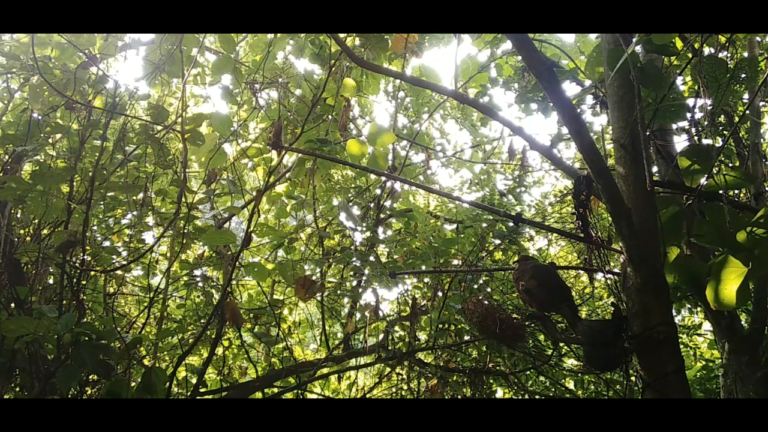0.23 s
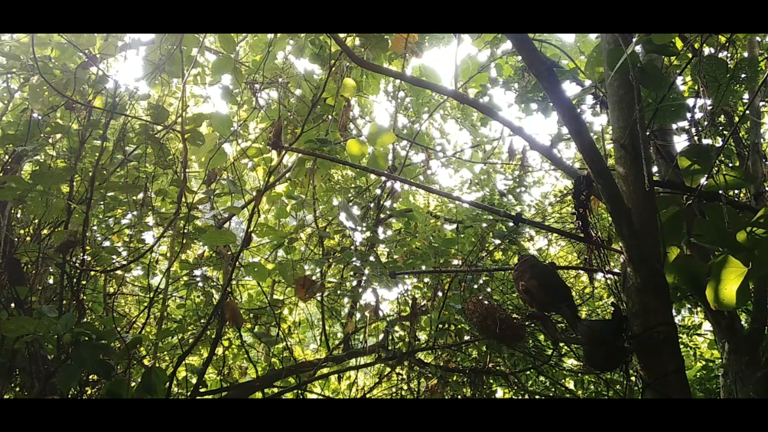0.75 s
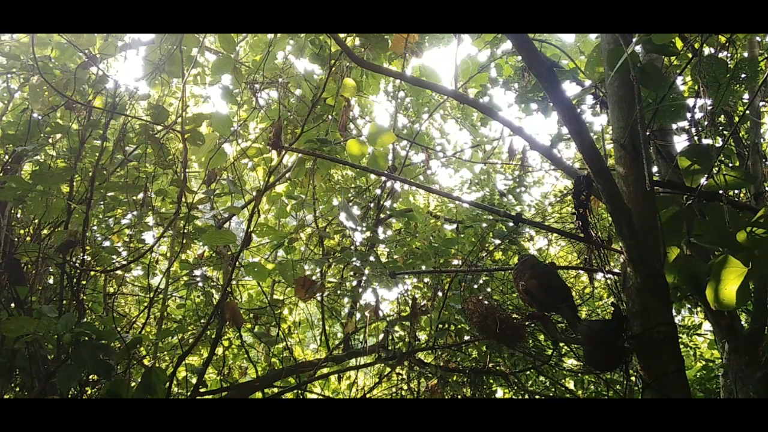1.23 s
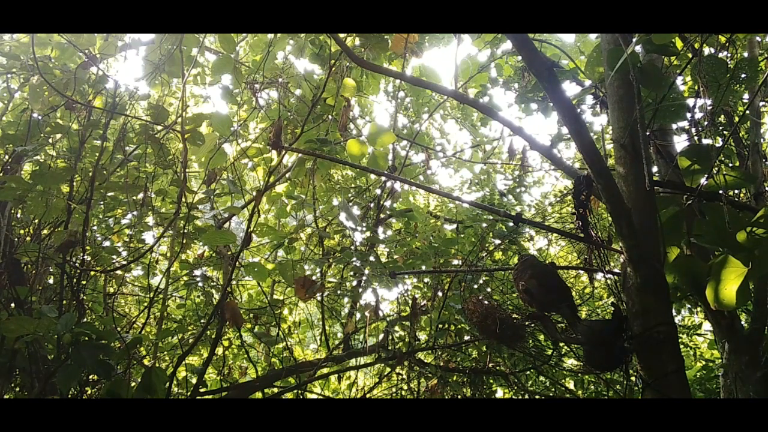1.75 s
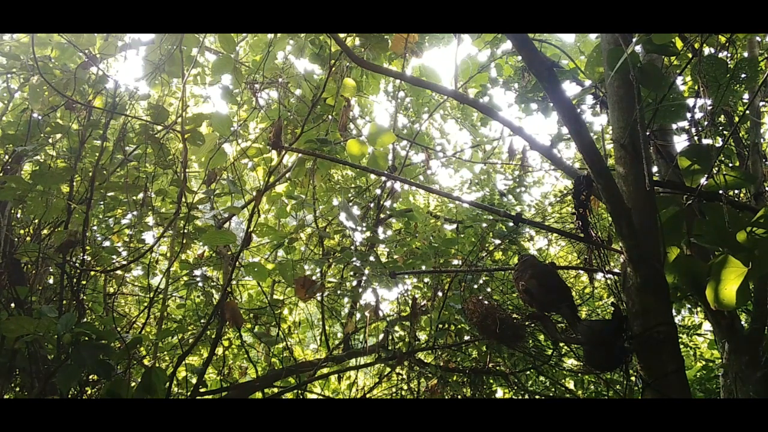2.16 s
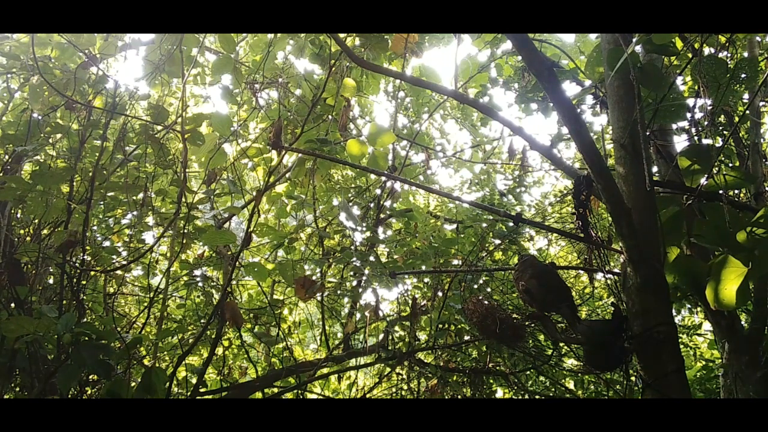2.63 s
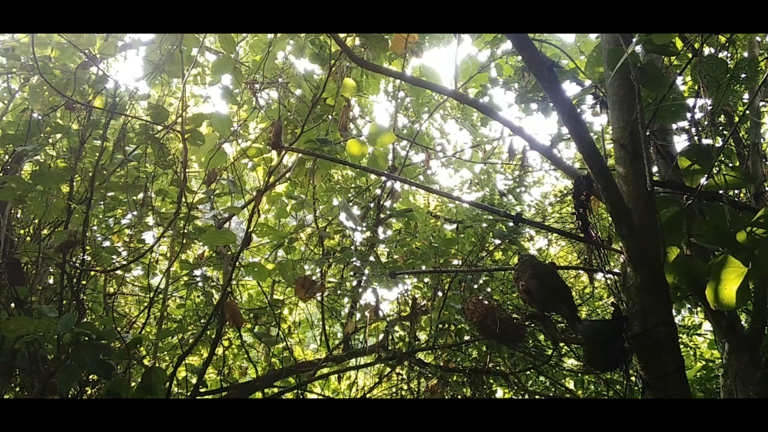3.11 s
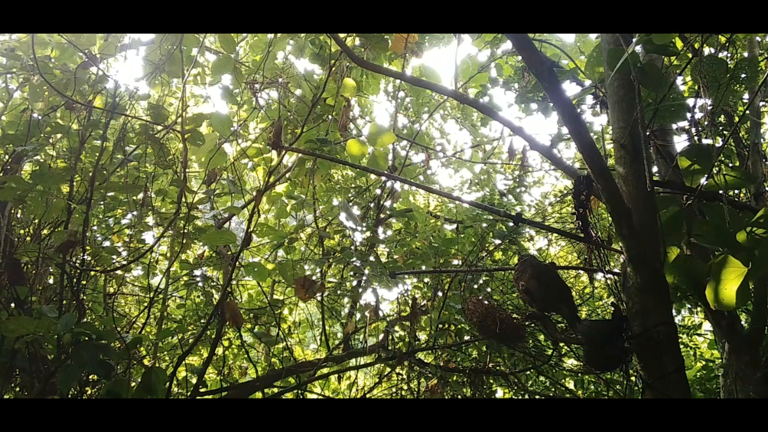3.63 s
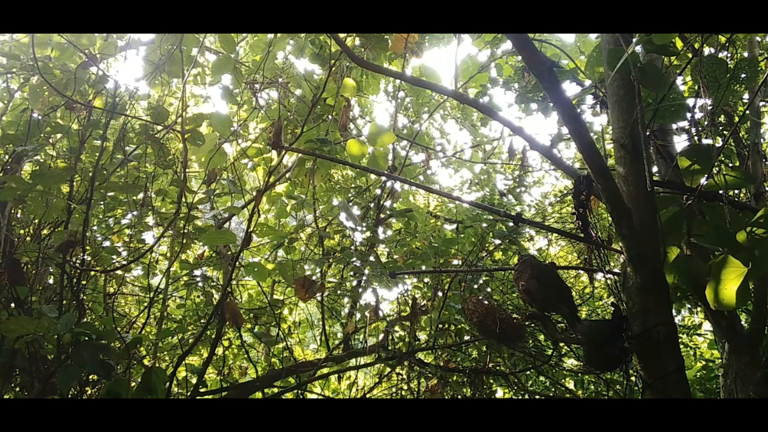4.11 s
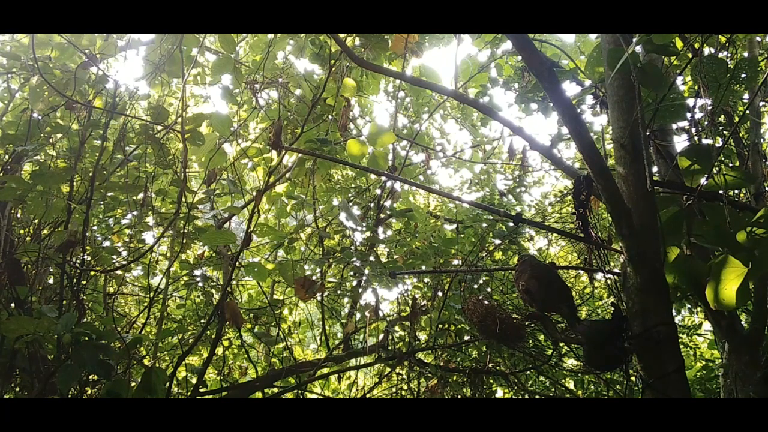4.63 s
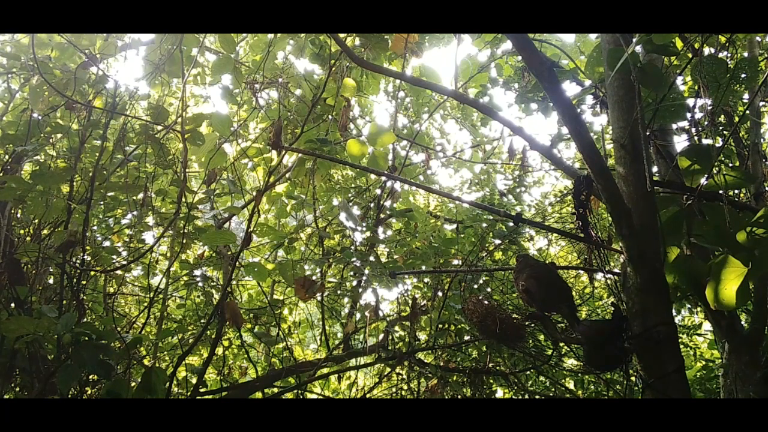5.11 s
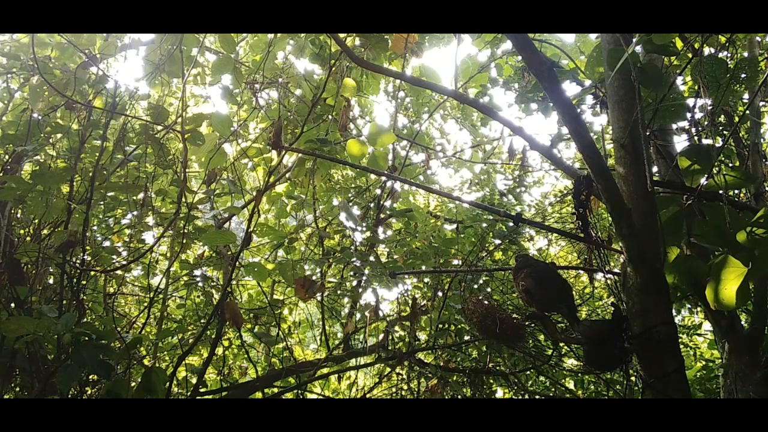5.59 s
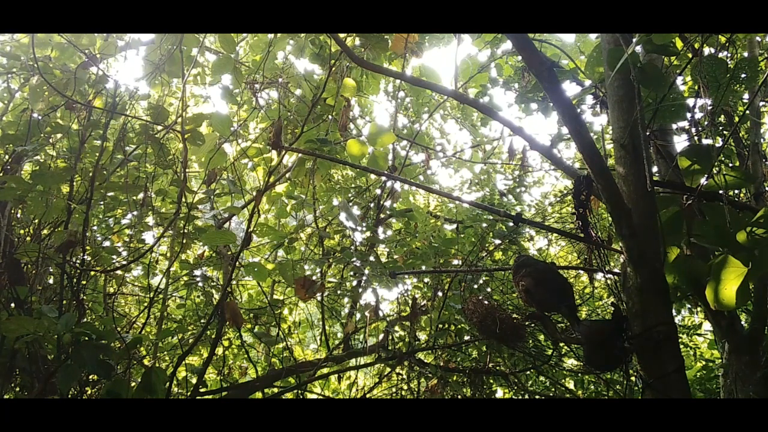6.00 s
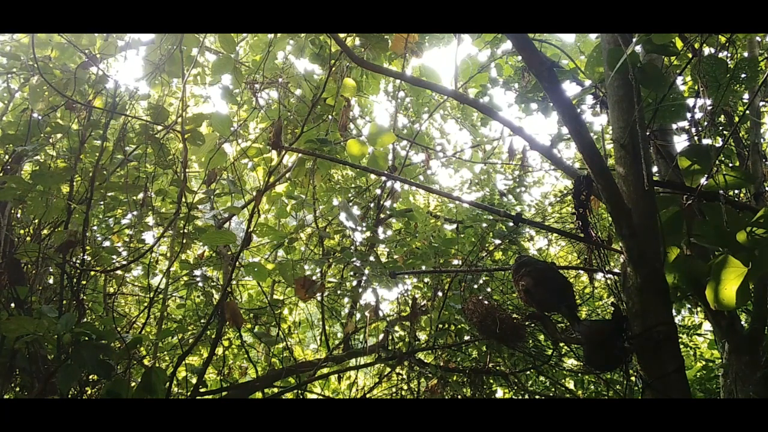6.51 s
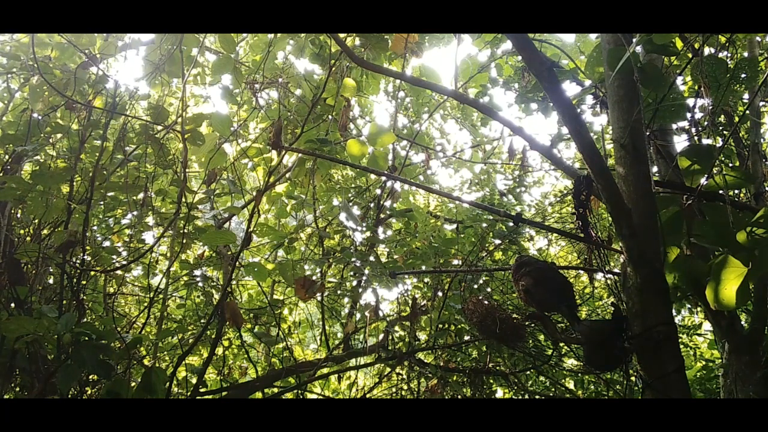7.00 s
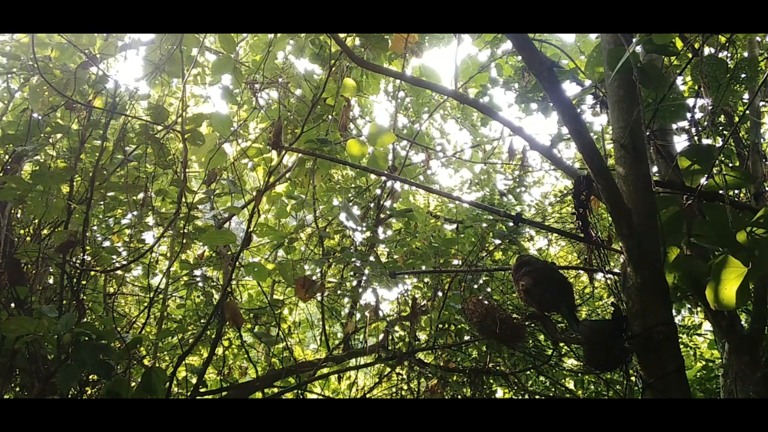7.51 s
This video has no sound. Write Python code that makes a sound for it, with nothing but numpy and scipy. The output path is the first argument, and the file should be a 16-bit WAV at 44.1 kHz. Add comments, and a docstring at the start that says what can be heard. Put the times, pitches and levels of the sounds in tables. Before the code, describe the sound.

Countless cicadas buzz high and steady throughout in a wooded place, heard in stereo and leaning left. Early on, a hoarse bird starts a quiet run of short calls, and a nearer cicada begins the first of three growing trills that each stop short. Soft, pulsing katydid rasps and a few very faint rising bird chirps come through the drone, with far traffic rumbling low behind everything.

```python
"""Daytime thicket, two spaced microphones

A cicada chorus of countless tymbal clicks drones and throbs near 8 kHz; single cicadas swell into
trills just below it. A katydid rasps its wings in phrases, a small bird chirps, a hoarse one calls.
Distant traffic rumbles, with a brief whine and an engine hum, over the hiss of leaves and microphones."""
import sys
import numpy as np
from scipy import signal
from scipy.fft import rfft, irfft, next_fast_len
from scipy.io import wavfile
from scipy.ndimage import uniform_filter1d, map_coordinates

SR = 44100
rng = np.random.default_rng(int(sys.argv[2]) if len(sys.argv) > 2 else 0)


def wav_out(sig):
    """Save sig, one row per channel (or a flat mono array), as 16-bit PCM at SR to the path in sys.argv[1]."""
    wavfile.write(sys.argv[1], SR, np.round(np.clip(np.atleast_2d(sig).T, -1, 1) * 32767).astype(np.int16))


N = 341775
TIME = np.arange(N) / SR
LEAD_S = .0003434  # left microphone ahead of right


def amp(db):
    """Decibels to gain."""
    return 10 ** (np.asarray(db) / 20)


def unit(x):
    """Scale to rms 1."""
    return x / np.sqrt(np.mean(x ** 2) + 1e-20)


def along(points, hz):
    """Interpolate (freq_hz, value) points on a log frequency axis."""
    freqs, values = np.transpose(points)
    return np.interp(np.log(hz + 1), np.log(freqs + 1), values)


def curves(rows):
    """One value per sample for each column after time_s."""
    time_s, *columns = np.transpose(rows)
    return [np.interp(TIME, time_s, column) for column in columns]


def gate(start_s, stop_s, fade_s):
    """On from start to stop, with linear fades."""
    return np.clip(np.minimum(TIME - start_s, stop_s - TIME) / fade_s, 0, 1)


def wobble(rate_hz):
    """Smooth random curve with knots at rate_hz."""
    return map_coordinates(rng.standard_normal(int(N * rate_hz / SR) + 4), [TIME * rate_hz])


def filtered(x, response):
    """Apply a complex frequency response."""
    size = next_fast_len(N + SR // 2)
    return irfft(rfft(x, size) * response(np.fft.rfftfreq(size, 1 / SR)), size)[..., :N]


def coloured(x, spectrum):
    """Shape by (freq_hz, gain_db) points, nothing outside them; rms 1."""
    inside = lambda hz: (hz >= spectrum[0][0]) & (hz <= spectrum[-1][0])
    return unit(filtered(x, lambda hz: amp(along(spectrum, hz)) * inside(hz)))


def noise_pair(spectrum):
    """Coloured noise, unrelated left and right."""
    return coloured(rng.standard_normal((2, N)), spectrum)


def spread(pair, coherence):
    """Mix two unrelated signals to a left-right coherence, left leading."""
    angle = lambda hz: np.arccos(np.clip(coherence(hz), -1, 1)) / 2
    mid, side = filtered(pair, lambda hz: np.array([np.cos(angle(hz)), np.sin(angle(hz))]))
    lead = lambda hz: np.exp(np.outer([1, -1], 1j * np.pi * hz * LEAD_S))
    return filtered(np.array([mid + side, mid - side]), lead)


def thicket(x, wet_db, t60_s, left_db, lead_s=LEAD_S):
    """Direct sound from the left plus scatter off trunks and moving leaves, different at each side."""
    t = np.arange(SR // 2) / SR
    tails = rng.standard_normal((2, len(t))) * amp(-60 * t / t60_s)
    scatter = signal.fftconvolve(x[None], tails / np.linalg.norm(tails[0]), axes=1)[:, :N]
    bins = signal.stft(scatter, nperseg=2048)[2]
    paths = uniform_filter1d(rng.standard_normal((2, *bins.shape)), size=3, axis=2)
    bins = bins * (paths[0] + 1j * paths[1])  # each frequency fades by itself
    scatter = unit(signal.istft(bins, nperseg=2048)[1][:, :N]) * x.std()
    direct = np.array([x, filtered(x, lambda hz: np.exp(-2j * np.pi * hz * lead_s))])
    pan = amp([[left_db / 2], [-left_db / 2]])
    return (direct + amp(wet_db) * scatter) / np.hypot(1, amp(wet_db)) * pan


# common throb: from_s, rate_hz
THROB_PACE = [(0, 12.84), (1, 13.89), (3, 14.16), (5, 13.26)]
# singers fall into step, then scatter: time_s, depth_ratio
THROB_DEPTH = [(0, 0.1), (2.5, 0.28), (3, .06), (5.5, 0.23), (6, 0.13), (7, 0.32), (7.5, 0.06)]
# belly resonance of the chorus: freq_hz, gain_db
CHORUS_BELLY = [(3650, -55), (6200, -35.5), (6790, -24.5), (7290, -16.5), (7430, -9.5), (7760, 1.5),
                (8020, 6), (8260, 5), (8500, -5), (8860, -22.5), (9400, -36.5), (12200, -36.5),
                (20700, -120)]
# lower singers sit left: freq_hz, left_over_right_db
CHORUS_PAN = [(6500, -5.5), (7200, 9), (7800, 1), (8400, -3.5), (9200, -20)]
# near singers' peaks: centre_hz, width_hz, left_gain_db
SINGER_PEAKS = [(7710, 50, 2.5), (7850, 55, 3.5), (8160, 65, 4.5), (8470, 45, 4)]
# low singer's loudness: time_s, level_db
LOW_SINGER_LEVEL = [(0, -50), (3, -58), (4, -47), (5, -62), (6, -52), (7.75, -53)]
# its belly resonance: freq_hz, gain_db
LOW_SINGER_BELLY = [(6900, -28), (7250, -6), (7500, -9), (7750, -4), (8000, -20)]
def chorus(level_db=-32, left_db=5.5, start_turns=-.27):
    """Countless tymbal clicks merge into noise; near singers' bursts and common throb stay audible."""
    from_s, rate_hz = np.transpose(THROB_PACE)
    throb_hz = rate_hz[np.searchsorted(from_s, TIME, "right") - 1]
    throb = np.cos(2 * np.pi * (start_turns + np.cumsum(throb_hz) / SR))
    power = 1 + curves(THROB_DEPTH)[0] * throb
    for burst_hz, depth in [(68.5, .33), (82, .1), (150, .064), (164, .12)]:
        drift_turns = .25 * np.array([wobble(1.344), wobble(1.065)])
        power = power * (1 + depth * np.cos(2 * np.pi * (burst_hz * TIME + drift_turns)))
    flutter = amp(.66 * np.array([wobble(10), wobble(3.26)]))
    clicks = rng.standard_normal((2, N)) * flutter * np.sqrt(np.abs(power))
    drone = spread(coloured(clicks, CHORUS_BELLY), lambda hz: np.full_like(hz, .28))

    def placement(hz):
        peaks_db = sum(db / (1 + (2 * (hz - centre) / width) ** 2) for centre, width, db in SINGER_PEAKS)
        return amp(np.outer([.5, -.5], along(CHORUS_PAN, hz)) + np.outer([1, .3], peaks_db))

    crowd = amp(level_db + left_db * np.array([[.5], [-.5]])) * filtered(drone, placement)
    low_singer = amp(curves(LOW_SINGER_LEVEL)[0] + 3.7 * throb) * noise_pair(LOW_SINGER_BELLY)
    return crowd + low_singer * amp([[4.5], [-9]])


def glides(rows, waver_hz, flicker_db, fade_s):
    """Slightly unsteady tones, each gliding straight between two pitches."""
    drift_hz, flicker = waver_hz * wobble(9), amp(flicker_db * wobble(5))
    tones = np.zeros(N)
    for start_s, stop_s, from_hz, to_hz, level_db in rows:
        turns = np.cumsum(np.interp(TIME, [start_s, stop_s], [from_hz, to_hz]) + drift_hz) / SR
        tones += np.sqrt(2) * amp(level_db) * gate(start_s, stop_s, fade_s) * np.sin(2 * np.pi * turns)
    return flicker * tones


# road noise: time_s, rumble_db, drone_db
ROAD_LEVELS = [(0, -46, -63), (1.1, -44, -59.5), (1.6, -46, -59.5), (2.2, -46, -62.5), (6, -44.5, -61.5),
               (6.25, -43, -64), (6.67, -45.5, -59.5), (7.75, -44.5, -64)]
# its two spectra: freq_hz, gain_db
ROAD_RUMBLE = [(11, -48), (18, -6.5), (48, 0.5), (102, -3), (220, -13), (247, -16), (400, -25), (520, -26),
               (880, -120)]
ROAD_DRONE = [(150, -59), (250, -8), (610, -5.5), (1500, -18.5), (1950, -47), (3300, -120)]
# left-right likeness: freq_hz, coherence_ratio
ROAD_COHERENCE = [(60, 0.91), (140, 1), (330, 0.74), (600, 0.57), (900, 0.31), (1300, 0.88), (2000, .08)]
# brief whine, slowing engine: start_s, stop_s, from_hz, to_hz, level_db
ROAD_WHINE = [(1.4, 1.62, 605, 580, -65), (1.6, 1.98, 582, 583, -61), (1.97, 2.1, 580, 565, -66),
              (2.2, 2.36, 572, 573, -67)]
ENGINE_HUM = [(5.9, 7.85, 227.5, 214.9, -59.5)]
def traffic():
    """Far road noise, nearly alike at both microphones in the bass, with a whine and an engine hum."""
    rumble_db, drone_db = curves(ROAD_LEVELS)
    rumble = amp(rumble_db + .75 * wobble(7.2)) * noise_pair(ROAD_RUMBLE)
    drone = amp(drone_db + 2.24 * wobble(5)) * noise_pair(ROAD_DRONE)
    road = spread(rumble + drone, lambda hz: along(ROAD_COHERENCE, hz))
    hum = glides(ENGINE_HUM, waver_hz=1.43, flicker_db=.94, fade_s=.48)
    whine = glides(ROAD_WHINE, waver_hz=1.56, flicker_db=.88, fade_s=.033)
    return (road + hum + whine) * amp([[.45], [-.45]])


# leaf and microphone hiss: freq_hz, gain_db
LEAF_HISS = [(700, 0), (1300, -0.5), (2500, -1.5), (4500, -0.5), (6200, 0.5), (9500, -0.5), (12500, -3.5),
             (15500, -2)]
# twigs: start_s, level_db, band_hz, t60_s
TWIG_TICKS = [(1.397, -53, 3500, .01), (3.25, -56, 10300, .012), (4.24, -50, 10300, .08),
              (4.335, -55, 10300, .015), (5.44, -46, 1800, .012), (5.446, -48, 2800, .02),
              (6.97, -56, 2900, .006)]
def leaves():
    """Faint patchy hiss, unrelated left and right, and a few twig ticks."""
    bins = signal.stft(rng.standard_normal((2, N)), nperseg=512)[2]
    field = uniform_filter1d(rng.standard_normal(bins.shape[1:]), 8, axis=0)
    patches = amp(1.5 * unit(uniform_filter1d(field, 10, axis=1)))
    hiss = amp(-52.5) * coloured(signal.istft(bins * patches, nperseg=512)[1][:, :N], LEAF_HISS)
    t = np.arange(SR // 10) / SR
    for start_s, level_db, band_hz, t60_s in TWIG_TICKS:
        band = signal.butter(1, [band_hz / 2, band_hz * 1.5], "band", fs=SR)
        tick = unit(signal.lfilter(*band, rng.standard_normal((2, len(t)))))
        hiss[:, round(start_s * SR):][:, :len(t)] += amp(level_db - 60 * t / t60_s) * tick
    return hiss


# chirps: start_s, length_s, from_hz, to_hz, level_db
BIRD_CHIRPS = [(.072, .035, 2200, 2750, -62), (.918, .03, 2350, 2720, -61), (3.015, .02, 2000, 2150, -62),
               (6.925, .025, 2300, 2500, -62)]
def small_bird():
    """Short rising whistles."""
    voice = np.zeros(N)
    for start_s, length_s, from_hz, to_hz, level_db in BIRD_CHIRPS:
        progress = np.linspace(0, 1, round(length_s * SR))
        turns = np.cumsum(from_hz + (to_hz - from_hz) * progress) / SR
        chirp = np.sin(np.pi * progress) * np.sin(2 * np.pi * turns)
        voice[round(start_s * SR):][:len(chirp)] += amp(level_db) * chirp
    return thicket(voice, wet_db=-23, t60_s=.1, left_db=.3)


# phrases: first_s, last_s, syllable_count, first_db, last_db
KATYDID_PHRASES = [(.076, .825, 6, -62, -47), (1.045, 1.496, 4, -54.5, -56), (1.648, 2.072, 4, -54, -49),
                   (2.175, 3.14, 7, -55, -58), (3.326, 4.028, 6, -54.5, -49.5),
                   (4.151, 4.74, 4, -54.5, -64), (5.04, 5.605, 5, -54.5, -49.5), (5.84, 6.146, 3, -57, -54),
                   (6.34, 6.916, 5, -51.5, -48.5), (7.12, 7.62, 3, -59, -55.5)]
# wing resonance and its octave: freq_hz, gain_db
WING_LOW = [(4700, -23), (5150, -9.5), (5400, -2.5), (5650, -1.5), (5900, -17), (6300, -38)]
WING_HIGH = [(9600, -28), (10200, -2.5), (10700, -1), (11200, -5.5), (12000, -43)]
def katydid(stroke_hz=95, half_width_s=.037):
    """Each syllable is a soft swell of wing strokes; the octave carries better to the right."""
    power = np.zeros(N)
    for first_s, last_s, count, first_db, last_db in KATYDID_PHRASES:
        for progress in np.linspace(0, 1, round(count)):
            centre_s = first_s + (last_s - first_s) * progress
            level_db = first_db + (last_db - first_db) * progress ** .6
            power += amp(2 * level_db) * np.exp(-((TIME - centre_s) / half_width_s) ** 2)
    strokes = np.sqrt(power) * (1 + .11 * np.cos(2 * np.pi * (stroke_hz * TIME + .63 * wobble(6.6))))
    far = amp(1.1 * wobble(2.4))  # farther katydids blur into steady bands
    low = np.hypot(strokes, amp(-64.5) * far) * noise_pair(WING_LOW)
    high = np.hypot(amp(-2.2) * strokes, amp(-58.5) * far) * noise_pair(WING_HIGH)
    return low * amp([[1.2], [-8]]) + high * amp([[-14], [0]])


def tymbal(belly, click_hz, beat_hz, beat_depth, drift, rough):
    """Even clicks ring the belly as lines one click rate apart; a muscle beat adds sidebands."""
    turns = np.cumsum(click_hz * (1 + drift * wobble(14))) / SR
    lowest, highest = int(belly[0][0] / click_hz), int(belly[-1][0] / click_hz)
    clicks = sum(np.cos(2 * np.pi * k * turns) for k in range(lowest, highest + 1))
    clicks *= 1 + beat_depth * np.cos(2 * np.pi * beat_hz * TIME + 1.16 * wobble(5.7))
    return coloured(unit(clicks) * amp(1.1 * wobble(25)) + rough * rng.standard_normal(N), belly)


def swells(rows, rise_db=21, fade_s=.06):
    """Each trill grows towards full voice and stops short."""
    envelope = np.zeros(N)
    for start_s, stop_s, full_db, swell_s in rows:
        level_db = full_db - rise_db * np.exp(-np.abs(TIME - start_s) / swell_s)
        envelope += amp(level_db) * gate(start_s, stop_s, fade_s)
    return envelope


# near and far cicada's trills: start_s, stop_s, full_db, swell_s
NEAR_TRILLS = [(.6, 2.2, -46, 0.37), (3.35, 4.62, -41.5, 0.26), (5.6, 7.5, -38, 0.57)]
FAR_TRILLS = [(4.5, 5.54, -54.5, .05)]
# their belly resonances: freq_hz, gain_db
NEAR_RESONANCE = [(6400, -34), (6620, -21), (6750, -20), (6810, -3), (6900, -1), (7000, 0), (7080, -3),
                  (7140, -18), (7500, -40)]
FAR_RESONANCE = [(6400, -40), (6570, -12), (6750, -5), (6930, -8), (7050, -11), (7300, -42)]
def cicada_trills():
    """One cicada swells three times; a second answers once, a little lower."""
    near = tymbal(NEAR_RESONANCE, click_hz=194.75, beat_hz=72, beat_depth=1.1, drift=.0011, rough=1.7)
    far = tymbal(FAR_RESONANCE, click_hz=177.6, beat_hz=45, beat_depth=.8, drift=.001, rough=1.5)
    return (thicket(swells(NEAR_TRILLS) * near, wet_db=.088, t60_s=.15, left_db=14.3)
            + thicket(swells(FAR_TRILLS) * far, wet_db=-1.5, t60_s=.15, left_db=11.4))


# calls: start_s, length_s, third_harmonic_hz, level_db
BIRD_CALLS = [(.758, 0.066, 1930, -50), (.826, 0.14, 1587, -49.5), (1.099, 0.038, 1094, -51),
              (1.357, 0.18, 1546, -52.5), (1.653, .055, 1210, -57), (1.893, 0.19, 1487, -53),
              (2.249, 0.071, 1340, -61), (2.474, 0.21, 1512, -50.5), (2.821, 0.12, 1410, -55),
              (3.055, 0.18, 1462, -54), (3.324, 0.18, 1435, -52), (3.593, .197, 1490, -52.5),
              (3.907, 0.17, 1427, -52), (4.193, 0.2, 1494, -51.5), (4.513, .09, 1320, -55),
              (4.799, 0.29, 1506, -51), (5.165, 0.085, 1320, -54.5), (5.471, .256, 1502, -51),
              (5.825, 0.11, 1274, -54), (6.152, 0.25, 1540, -50.5), (6.485, 0.12, 1333, -55)]
# rise and fall of a call: length_fraction, pitch_ratio
CALL_ARCH = [(0, .95), (.17, .97), (.5, 1), (.83, .91), (1, .87)]
# voice: harmonic_number, gain_db
CALL_HARMONICS = [(2, -17), (3, 0), (4, -17)]
# throat rasp: freq_hz, gain_db
THROAT_RASP = [(750, -30), (1000, -11), (1200, -12), (1380, -3), (1580, 0), (1780, -9), (2300, -26)]
def hoarse_bird(hoarse_per_s=2.9, hoarsest=.68, strained_hz=1700, fade_s=.019):
    """The third harmonic leads; long or high calls shake and rasp most, clearing towards the end."""
    voice, shake = np.zeros(N), wobble(300)
    rasp = coloured(rng.standard_normal(N), THROAT_RASP)
    for start_s, length_s, third_hz, level_db in BIRD_CALLS:
        span = slice(round(start_s * SR), round((start_s + length_s) * SR))
        progress = (TIME[span] - start_s) / length_s
        pitch_hz = third_hz / 3 * np.interp(progress, *np.transpose(CALL_ARCH))
        hoarse = hoarsest if third_hz > strained_hz else min(hoarse_per_s * length_s, hoarsest)
        rough = hoarse * (1 - .55 * progress ** 2)
        turns = np.cumsum(pitch_hz * (1 + .13 * rough * shake[span])) / SR
        envelope = np.clip(np.minimum(progress, 1 - progress) * length_s / fade_s, 0, 1)
        tone = sum(amp(db) * np.sin(2 * np.pi * k * turns) for k, db in CALL_HARMONICS)
        call = np.sqrt(1 - rough ** 2) * tone + .72 * rough * rasp[span]
        voice[span] += amp(level_db) * envelope * call
    return thicket(voice, wet_db=-7, t60_s=.16, left_db=.4, lead_s=.00038)


def scene():
    """All sources at the two microphones."""
    return chorus() + traffic() + leaves() + small_bird() + katydid() + cicada_trills() + hoarse_bird()


def record(dry):
    """Nothing passes above the band limit."""
    limit_hz = 15500
    return filtered(dry, lambda hz: hz < limit_hz)


dry = scene()
out = record(dry)
wav_out(out)
```